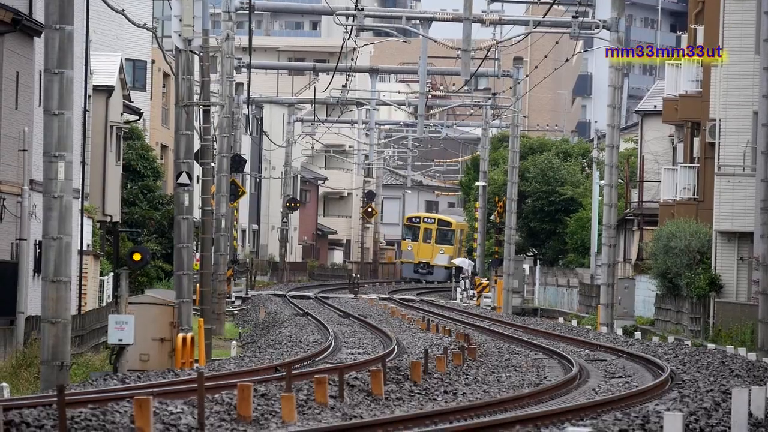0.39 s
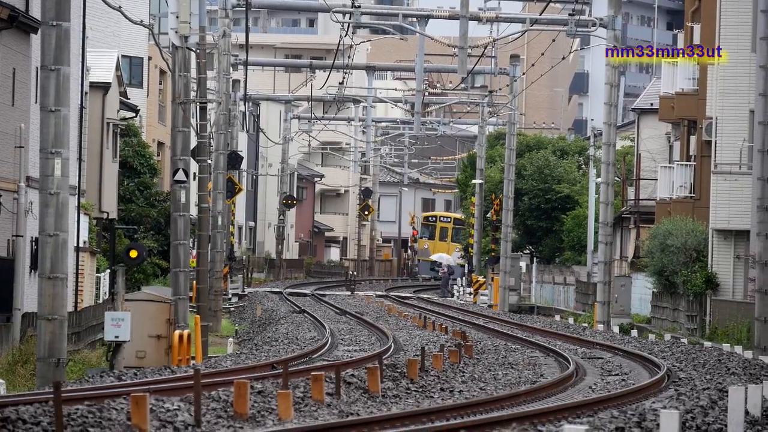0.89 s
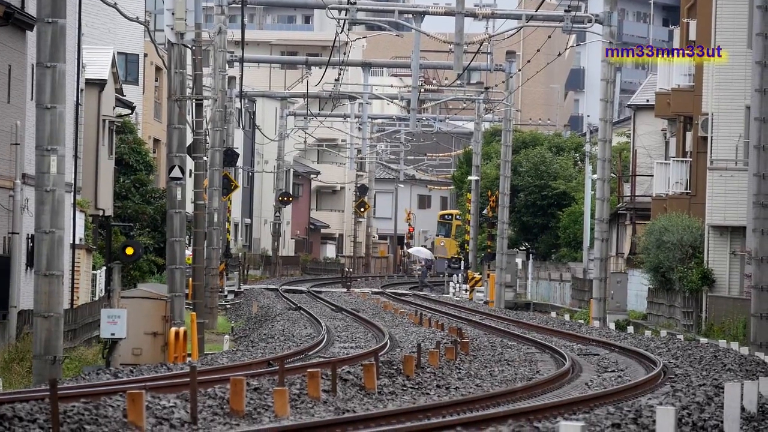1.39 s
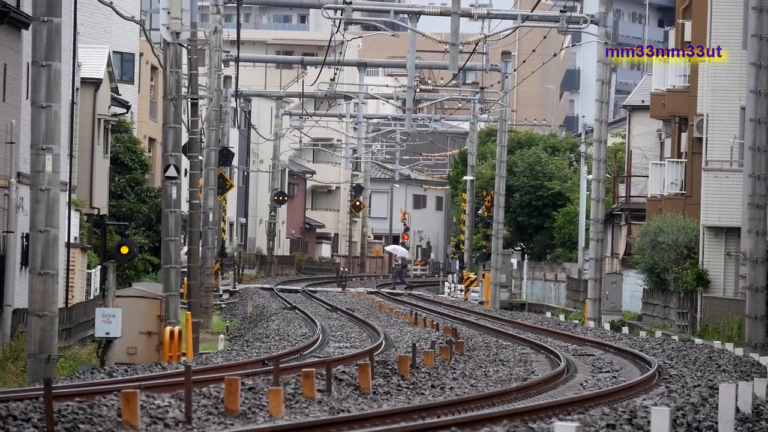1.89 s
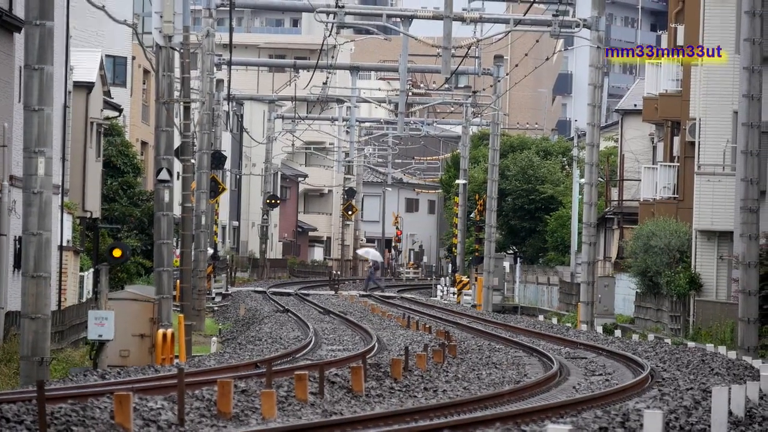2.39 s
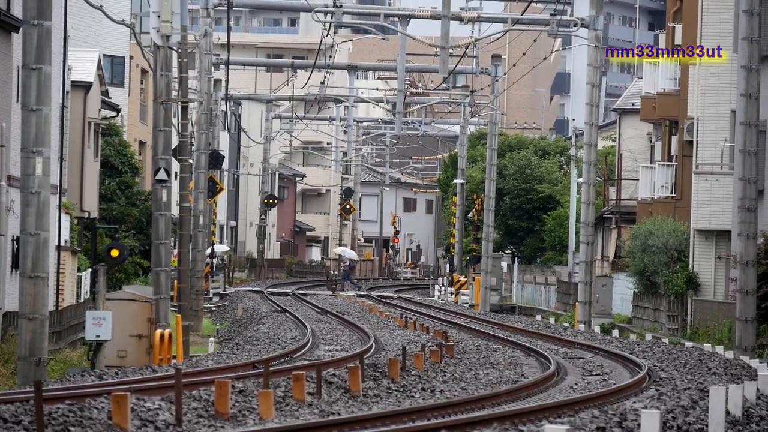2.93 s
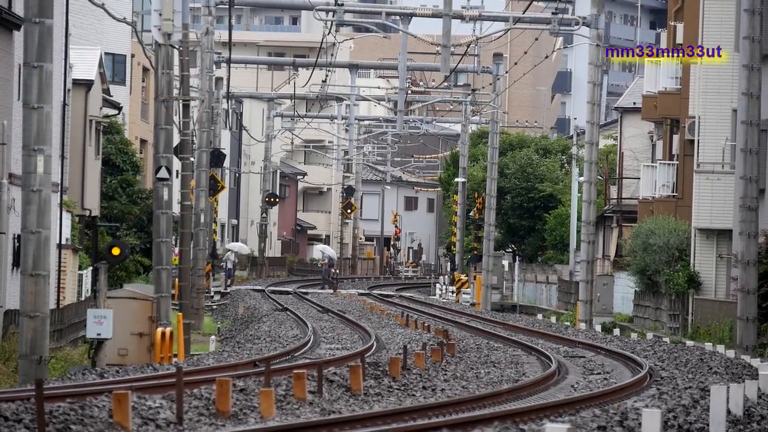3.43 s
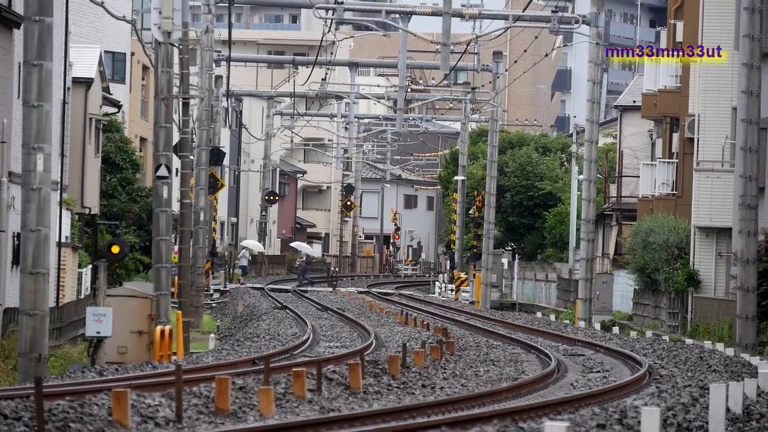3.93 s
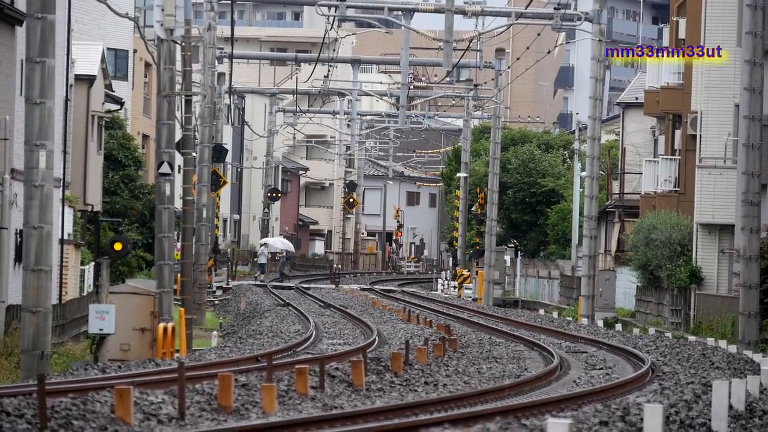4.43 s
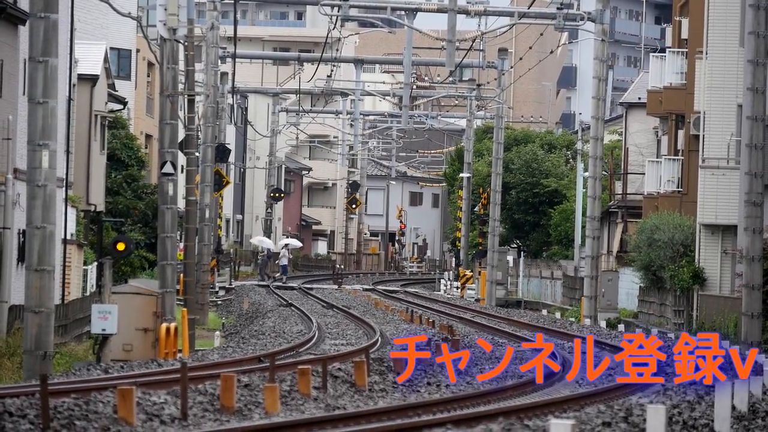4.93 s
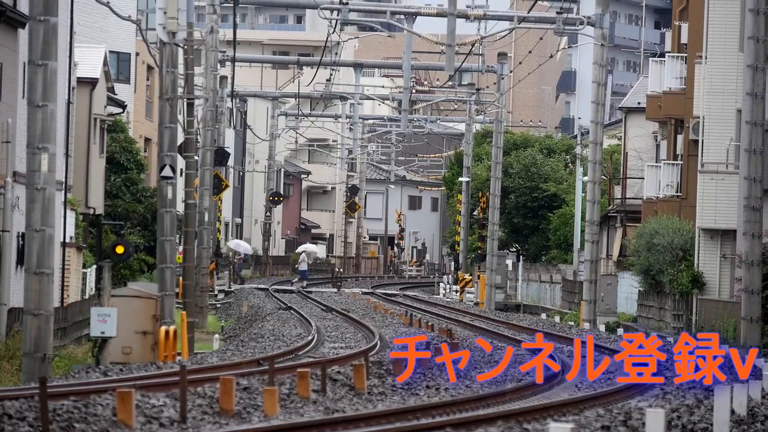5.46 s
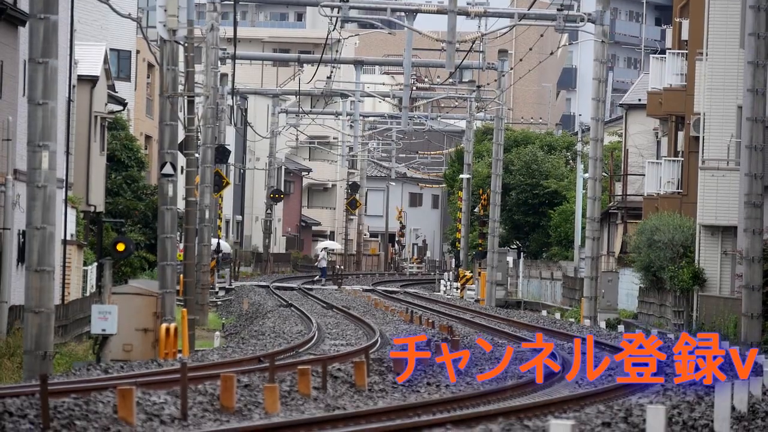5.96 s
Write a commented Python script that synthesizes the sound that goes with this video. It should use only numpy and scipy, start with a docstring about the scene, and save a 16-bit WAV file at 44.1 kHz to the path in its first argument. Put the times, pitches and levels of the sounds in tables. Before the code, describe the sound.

Outdoors in a built-up street in fine rain, a departing train's high wheel squeal comes in distant, wavering swells, strongest in the first two and a half seconds, over a faint fading roll. Sparrows chirp throughout with short echoes off house fronts. Raindrops knock and tick on a hand-held stereo camera, densest after the middle. Fingers thump it softly, and a button clicks at the very end.

```python
"""The squeal of train wheels comes first, in distant swells: slip noise driving wheel resonances in a curve.
Two sparrows whistle along frequency paths between houses, which return scattered echoes.
Drops tick on a hand-held camera and fingers thump it, as short knocks; at last a button clicks.
Shaped noise gives the fading roll of the train and the hush of town and fine rain.
Two close microphone ports colour left and right apart."""
import sys
import numpy as np
from scipy import signal
from scipy.fft import rfft, irfft
from scipy.io import wavfile
from scipy.ndimage import uniform_filter1d

SR = 44100
rng = np.random.default_rng(int(sys.argv[2]) if len(sys.argv) > 2 else 0)


def decibels_to_gain(level_db):
    """Convert a level in decibels to a linear amplitude gain (20 dB per decade)."""
    exponent = np.asarray(level_db, float) / 20
    return 10 ** exponent


def to_wav(s):
    """Save 16-bit WAV."""
    ch = np.atleast_2d(s).T  # columns
    pcm = np.round(np.clip(ch, -1, 1) * 32767)  # PCM
    wavfile.write(sys.argv[1], SR, pcm.astype(np.int16))


N = 268128
TIME = np.arange(N) / SR
FREQ = np.fft.rfftfreq(N, 1 / SR)

# Flange effort, the drive of the squeal: t/s, level/dB
SQUEAL = [(0.0, -47.5), (0.1, -50.5), (0.15, -57), (0.28, -47.5), (0.5, -48.5), (0.62, -58), (0.94, -58),
          (1.01, -54), (1.2, -58), (1.42, -55), (1.61, -49.5), (1.81, -50.5), (1.97, -60), (2.16, -58),
          (2.33, -49.5), (2.56, -63.5), (3.35, -65.5), (3.53, -51.5), (3.63, -61.5), (4.4, -64), (5.1, -63),
          (5.27, -57.5), (5.75, -64.5), (6.04, -63)]
# Centre of the singing modes at easy effort as the wheels move through the curve: t/s, f/Hz
SINGING = [(0.0, 2200), (1.25, 2210), (1.45, 2350), (1.75, 2240), (2.33, 2346), (2.7, 2135), (3.5, 2237),
           (4.1, 2326), (6.04, 2290)]
# Wheel resonances: f/Hz, width/Hz, relative level/dB
WHEEL_MODES = [(2067, 47, 2), (2142, 47, 0.5), (2200, 17, -3.5), (2250, 48, -2), (2300, 36, 2),
               (2352, 35, -4), (2409, 47, 2), (2526, 68, 2)]
SQUEAL_PAN_DB = -4.5  # added to the left port for all train sound
EASY_DB, SINK_HZ_PER_DB = -58.5, 7  # the pitch sinks as effort exceeds the easy level
EASY_SPREAD_HZ = 136  # range of modes excited at the easy level

# Sparrow notes before scaling by each call: t/s from the start, f/Hz, relative level/dB
TSIP = [(0, 6200, -7), (.004, 6650, 1), (.009, 6650, 2), (.017, 4600, -7), (.023, 5400, -5),
        (.032, 4750, -4), (.046, 3500, -12), (.056, 4100, -6.5), (.066, 4050, -10)]
CHURR = [(0, 4700, -8), (.010, 4150, -3), (.017, 3400, -4), (.024, 4050, -3.5), (.032, 3600, -3),
         (.038, 3100, 0), (.058, 3100, -2), (.068, 3150, -18)]
CHURR_UPPER = [(0, 5200, -9), (.008, 4750, -5), (.02, 4850, -10), (.034, 4500, -9)]  # the other half of the syrinx
CHEEP = [(0, 4110, -10), (.012, 3440, -4.5), (.03, 3386, -6.5), (.05, 3400, -12), (.06, 3370, -20)]
RISE = [(0, 4430, -8), (.02, 5200, -6), (.032, 6000, -1), (.04, 6400, -4)]
# Calls: t/s, level/dB, pitch factor, length factor, share of the note sung (0-1)
TSIPS = [(.191, -45, 1, 1, 1), (.836, -54, 0.99, 1.46, 1), (1.934, -47.5, 0.97, 1, 0.97),
         (2.861, -45, 1.01, 0.95, .55), (3.562, -60, 1.16, 1.1, 1), (4.029, -47, .97, 1, 1),
         (4.617, -49, 1.03, 0.95, .55), (5.533, -48.5, 1.02, 1, .42)]
CHURRS = [(0.266, -49.5, 0.98, 1.1, 1), (2.427, -49, 1, .9, 1), (3.565, -52, 0.97, 0.64, 1),
          (4.092, -46, 1.09, .9, 1), (4.802, -46, 1.01, 1.01, 1), (6.03, -45.5, 1.02, 0.62, 1)]
CHEEPS = [(5.43, -44.5, 1.01, 0.99, 1)]
RISES = [(5.447, -55, 1, 1, 1)]
WAVER_HZ = 90  # rms pitch deviation of a hoarse bird
# Reflections from house fronts: delay t/s, level/dB per sample of scatter
HOUSE_ECHOES = [(.034, -32), (.058, -37), (.108, -35)]

# Drops on the camera: t/s, left level/dB, right level/dB, knock f/Hz at the louder port, nominal tick level/dB
DROPS = [(1.3333, -21, -18, 4150, -32), (1.822, -55, -55, 2300, -41), (2.9221, -42, -35, 1650, -43),
         (3.0196, -28, -37, 1790, -50), (3.022, -33, -36, 1510, -55), (3.279, -36, -41, 1700, -57),
         (3.3352, -47, -48, 2400, -41), (3.694, -27, -38, 2380, -45), (3.7255, -37, -48, 2150, -40),
         (3.7471, -26, -35, 2020, -44), (3.7792, -46, -42, 1700, -42), (3.8067, -32, -46, 2300, -39.5),
         (3.8669, -31, -31, 4300, -38), (3.888, -38, -45, 3100, -58), (3.9565, -34, -40, 5000, -42),
         (4.0724, -22, -32, 2350, -33), (4.3817, -36, -48, 2350, -47), (4.5344, -20, -28, 2320, -35),
         (4.618, -32, -32, 4400, -38.5), (5.0336, -29, -36, 1750, -46), (5.0765, -22.5, -36, 2180, -36.5),
         (5.2602, -46, -43, 1300, -44), (5.9854, -45, -44, 3450, -57)]
# Shell resonances: f/Hz, half length/ms, level/dB relative to the tick
SHELL_MODES = [(6350, 0.15, -9.5), (10020, 0.13, 0), (13500, 0.094, -4.5)]
DULL_OCTAVES_PER_DB = .07  # the port farther from a drop hears it lower

# Finger thumps on the body, at the left port: t/s, level/dB, f/Hz
THUMPS = [(2.4274, -36, 104.9), (2.9897, -36.5, 96), (3.0214, -43, 141), (3.1688, -45, 149.8),
          (5.8545, -39, 93.9), (5.879, -44, 213), (5.9484, -28, 123), (5.9913, -31.5, 165)]
# Shifts of the grip, at the left port: t/s, rumble level/dB, hold/s, release/(dB per s)
GRIPS = [(2.97, -56.5, 0.29, 17), (5.85, -49, 0.15, 80)]
# Button resonances, at the right port: f/Hz, peak level/dB, half length/ms
BUTTON_MODES = [(262, -27, 0.96), (2075, -0.5, 0.22), (5760, -8.5, 0.11), (7940, -33, 1.2),
                (9700, -16.5, 0.128), (13200, -21, 0.099)]
BUTTON_S, BUTTON_SWELL = 6.0615, 2.16  # each mode peaks this many half lengths after the press

# Spectrum of the hush before the ports: f/Hz, relative level/dB per Hz
HUSH_COLOUR = [(30, -13), (60, -20), (100, -11.5), (200, -4), (500, 1), (950, 2.5), (1800, -6), (2800, -12),
               (4500, -17.5), (7000, -22), (10000, -23.5), (15000, -31)]
# Coherence of the hush between the ports: f/Hz, likeness (0-1)
HUSH_LIKENESS = [(60, 0.94), (250, 0.47), (500, 0.34), (1100, 0.97), (2000, 0.82), (4500, 0.96), (6800, 1),
                 (7600, 0.34), (15000, 1)]

# Left port relative to right: f/Hz, level/dB
PORT_BALANCE = [(60, 9.5), (110, 5), (200, 2.0), (380, -2), (700, -9.5), (1290, -4), (2380, -2), (4400, -1),
                (8120, -1.5), (15000, -3)]
# Phase by which left leads right (negative: lags): f/Hz, phase/rad
PORT_PHASE = [(60, 0.3), (250, -0.8), (500, -2), (690, -2.5), (950, -4), (1800, -4.0), (3000, -4.5),
              (5500, -4.5), (10000, -5.5), (16000, -5)]
NOTCH_HZ, NOTCH_WIDTH_HZ, NOTCH_DB = 7880, 96, -8.5  # microphone notch
TOP_HZ = 15700  # upper limit of the microphone


def curve(table):
    """Linear interpolation: columns of a table against time."""
    s, *columns = np.transpose(table)
    return [np.interp(TIME, s, c) for c in columns]


def over_freq(table):
    """Logarithmic interpolation: a (f/Hz, value) table over the spectrum."""
    hz, value = np.transpose(table)
    return np.interp(np.log(FREQ + 1), np.log(hz), value)


def unit(x):
    """Normalisation: the mean of the channels is brought to rms 1."""
    return x / np.std(np.mean(np.atleast_2d(x), axis=0))


def walk(rate):
    """Band-limited fluctuation: random levels held 1 / rate s and slewed twice; spread 1."""
    hold = int(SR / rate)
    steps = np.repeat(rng.standard_normal(size=4096)[:N // hold + 1], hold)
    slewed = uniform_filter1d(uniform_filter1d(steps, hold), hold)
    return unit(slewed[:N])


def ring(x, hz, width_hz):
    """Resonance: a second-order system passes a band about its natural frequency."""
    return signal.lfilter(*signal.iirpeak(hz, hz / width_hz, SR), x)


def ports(left, right, pan_db=0., colour=1, turn_rad=0.):
    """Two-port reception: the left differs in level and phase by frequency; direction adds its share."""
    level = decibels_to_gain(colour * over_freq(PORT_BALANCE) + pan_db)
    turn = level * np.exp(1j * (over_freq(PORT_PHASE) + turn_rad))
    return np.array([irfft(rfft(left) * turn, N), right])


def add(out, s, db, hz, ms, rebound=0.):
    """Impact: a Gaussian-enveloped oscillation; rebound 0-1 skews it to a push and a swing back."""
    first = int((s - ms / 250) * SR)  # four half lengths either side
    last = min(int((s + ms / 250) * SR), N)
    near = np.arange(first, last)
    t = near / SR - s
    envelope = np.exp(-.5 * (t * 1000 / ms) ** 2)
    out[near] -= decibels_to_gain(db) * envelope * np.cos(2 * np.pi * hz * t + rebound * np.pi / 2)


def squeal():
    """Friction-driven resonance: uneven flange slip feeds the wheel modes near the singing pitch."""
    db = curve(SQUEAL)[0]
    hz = curve(SINGING)[0] - SINK_HZ_PER_DB * (db - EASY_DB)
    slip = decibels_to_gain(1.54 * walk(70))
    spread = EASY_SPREAD_HZ * decibels_to_gain(0.19 * (db - EASY_DB))  # harder slip wakes more modes
    share = .85  # correlation of the ports
    both = 0
    for f, width, gain_db in WHEEL_MODES:
        near = np.exp(-.5 * ((hz - f) / spread) ** 2)
        driven = ring(slip * rng.standard_normal((2, N)), f, width)
        direct, scattered = ring(driven, f, 6 * width)
        left = share * direct + np.sqrt(1 - share ** 2) * scattered
        level = decibels_to_gain(gain_db + 1.4 * walk(12)) * near
        both = both + level * np.array([left, direct]) / np.std(direct)
    return unit(ports(*both, SQUEAL_PAN_DB, turn_rad=-0.55)) * decibels_to_gain(db)


def sing(note, calls, trill_hz, trill_depth_hz, rough_db):
    """Frequency modulation: a near-pure whistle follows the note's path, trilled by the syrinx."""
    out = np.zeros(N)
    s, hz, db = np.transpose(note)
    waver = WAVER_HZ * walk(300)
    for start, call_db, pitch, length, sung in calls:
        first = int(start * SR)
        t = np.arange(0, s[-1] * length * min(sung, 1), 1 / SR)[:N - first]
        path = pitch * uniform_filter1d(np.interp(t, s * length, hz), size=60)
        path = path + trill_depth_hz * np.sin(2 * np.pi * trill_hz * t)
        path = path + waver[first:][:len(t)]
        fade = np.minimum(1, np.minimum(t, t[::-1]) / 0.0018)
        level = fade * decibels_to_gain(call_db + np.interp(t, s * length, db))
        out[first:][:len(t)] += level * np.sin(2 * np.pi * np.cumsum(path) / SR)
    return out * decibels_to_gain(rough_db * walk(250))


def sparrows():
    """Diffuse reflection: house fronts return blurred copies of two birds, with a short tail."""
    song = sing(TSIP, TSIPS, 200.7, 81, 3.1)
    song += sing(CHURR, CHURRS, 170.2, 250, 3.7)
    song += sing(CHURR_UPPER, CHURRS, 684, 400, 2.7)
    song += sing(CHEEP, CHEEPS, 188.4, 290, 4.3)
    song += sing(RISE, RISES, 190, 40, 2.7)
    t = np.arange(SR // 2) / SR
    street = decibels_to_gain(-37 - 60 * t / 0.86)  # falls 60 dB per 0.86 s
    for s, db in HOUSE_ECHOES:
        street += decibels_to_gain(db) * np.exp(-.5 * ((t - s) / 0.00069) ** 2)
    scatter = street * rng.standard_normal((2, len(t)))
    echo = signal.fftconvolve(song[None], scatter, axes=1)[:, :N]
    return ports(*(song + echo))


def drops():
    """Impact excitation: drops knock the cover, ring the shell and splash; faint ones fall at random."""
    out, spray = np.zeros((2, N)), np.zeros(N)
    faint = []
    for u, v, w in rng.random(size=(80, 3)):
        knock_db = -54 + 8 * v
        faint.append((.02 + 6.0 * u, knock_db, knock_db, 1400 + 3000 * w, -58 + 9 * v))
    for s, left_db, right_db, knock_hz, tick_db in DROPS + faint:
        below_louder = np.array([left_db, right_db]) - max(left_db, right_db)
        left_hz, right_hz = knock_hz * 2 ** (DULL_OCTAVES_PER_DB * below_louder)
        add(out[0], s, left_db, left_hz, 450 / left_hz, rebound=0.6)  # half length about half a cycle
        add(out[1], s + .0001, right_db, right_hz, 550 / right_hz, rebound=0.92)
        spray[int(s * SR)] += decibels_to_gain(tick_db - 3.5)
        for hz, ms, db in SHELL_MODES:
            add(out[0], s, tick_db + db - 3, hz, ms)
            add(out[1], s, tick_db + db - 1.5, hz, ms)
    # the splash is a bright hiss with a decay constant of 0.9 ms
    fade = signal.lfilter([1], [1, -np.exp(-1000 / (.9 * SR))], spray)
    return out + fade * ring(rng.standard_normal((2, N)), 8000, 11000)


def hands():
    """Structure-borne sound: the body carries grip rumble and thumps mostly left, and the button click."""
    grip = 0
    for s, db, hold, release_db in GRIPS:
        attack = np.clip((TIME - s) / .05, 0, 1)
        grip = grip + attack * decibels_to_gain(db - release_db * np.maximum(TIME - s - hold, 0))
    rumble = unit(ring(ring(rng.standard_normal(N), 98, 130), 105, 200)) * grip
    for s, db, hz in THUMPS:
        add(rumble, s, db, hz, 3.5, rebound=0.19)
    click = np.zeros(N)
    for hz, db, ms in BUTTON_MODES:
        add(click, BUTTON_S + BUTTON_SWELL * ms / 1000, db, hz, ms)
    left_right = decibels_to_gain(np.array([[0], [-13]]))
    return rumble * left_right + ports(click, click, -3.1, colour=0)


def roll():
    """Broadband rolling noise: a broad band about 1 kHz fades as the train draws away."""
    noise = rng.standard_normal(N)
    for _ in range(2):
        noise = ring(noise, 1000, 1100)
    return unit(ports(noise, noise, SQUEAL_PAN_DB)) * decibels_to_gain(-58 - 3 * TIME)  # loses 3 dB per s


def hush():
    """Partial coherence: town noise and fine rain are partly alike at the ports; the treble patters."""
    like = np.clip(over_freq(HUSH_LIKENESS), 0, 1)
    patter = decibels_to_gain(0.88 * walk(400) + 1.2 * walk(40))
    smooth, grainy = rng.standard_normal((2, 2, N))
    treble = FREQ ** 2 / (FREQ ** 2 + 2500 ** 2)  # share of power that patters
    steady = np.sqrt(1 - treble) * rfft(smooth)
    mixed = steady + np.sqrt(treble) * rfft(unit(patter * grainy))
    right, other = mixed * decibels_to_gain(over_freq(HUSH_COLOUR))
    left = like * right + np.sqrt(1 - like ** 2) * other
    return unit(ports(irfft(left, N), irfft(right, N))) * decibels_to_gain(-53)


def scene():
    """Superposition: all sources add at the two ports."""
    return squeal() + sparrows() + drops() + hands() + roll() + hush()


def band_limit(x):
    """A steep low-pass at the top of the band."""
    return signal.sosfilt(signal.butter(12, 16510, fs=SR, output="sos"), x)


def record(dry):
    """Frequency response: the microphone drops deep bass and top and has a narrow treble notch."""
    notch = decibels_to_gain(NOTCH_DB * np.exp(-.5 * ((FREQ - NOTCH_HZ) / NOTCH_WIDTH_HZ) ** 2))
    bass_cut = FREQ ** 2 / (FREQ ** 2 + 55 ** 2)
    top_cut = 1 / (1 + (FREQ / TOP_HZ) ** 40)
    mix = irfft(rfft(dry) * notch * bass_cut * top_cut, N)
    return band_limit(mix)


dry = scene()
out = record(dry)
to_wav(out)
```